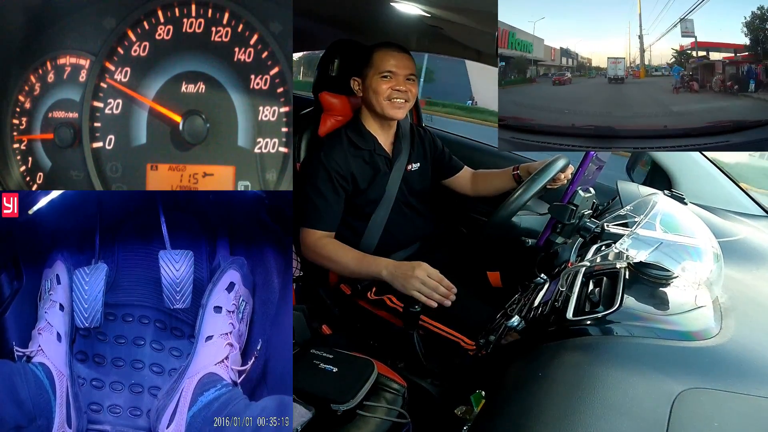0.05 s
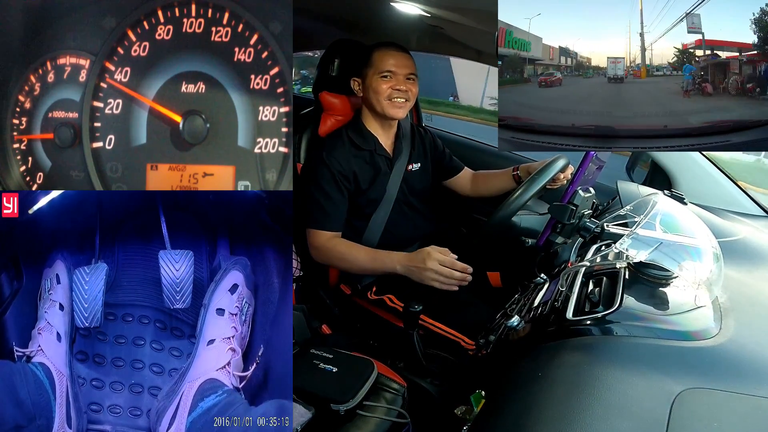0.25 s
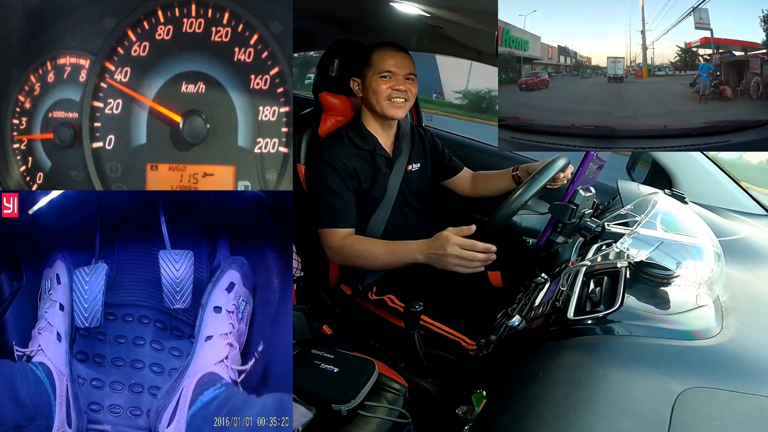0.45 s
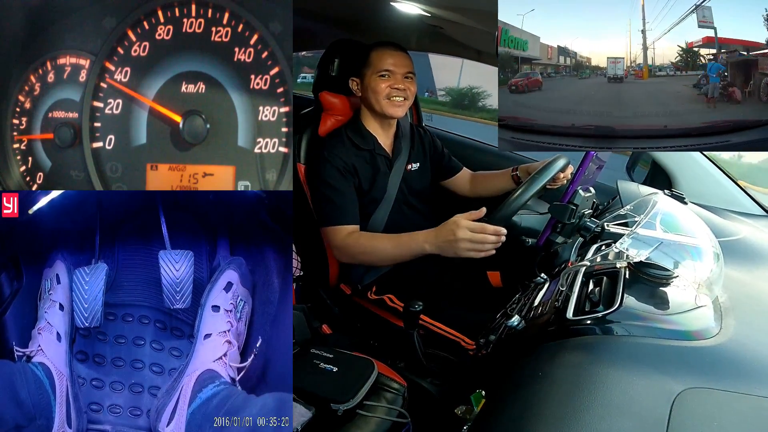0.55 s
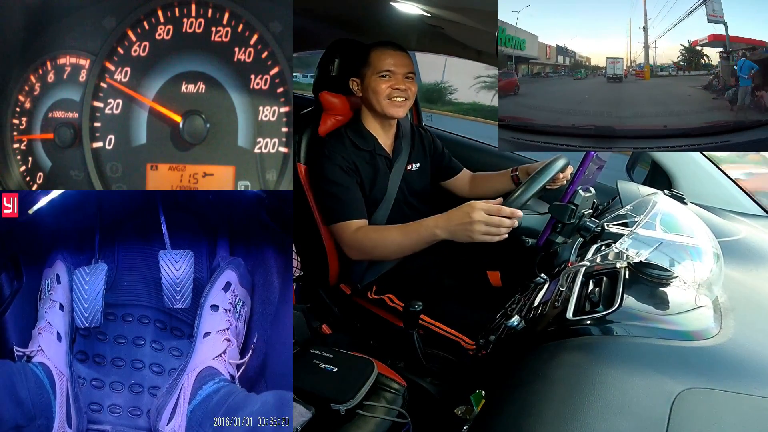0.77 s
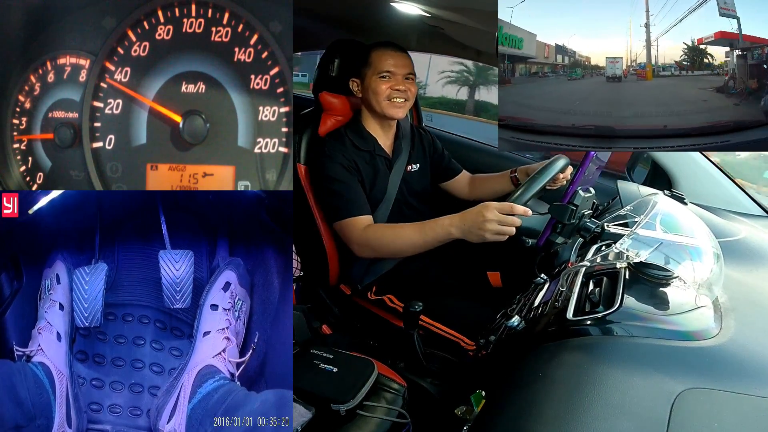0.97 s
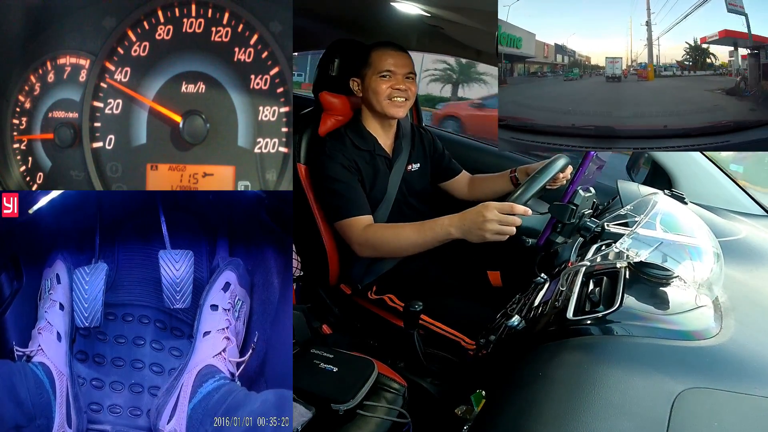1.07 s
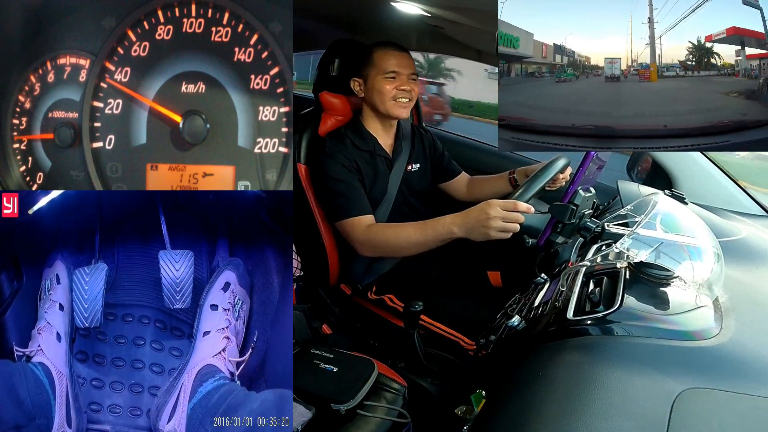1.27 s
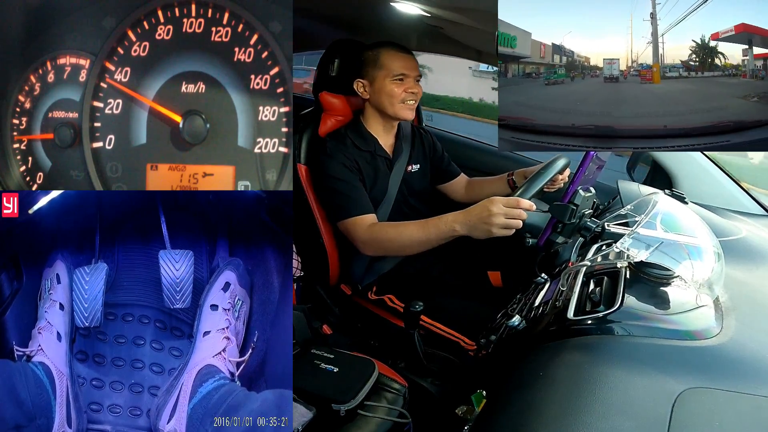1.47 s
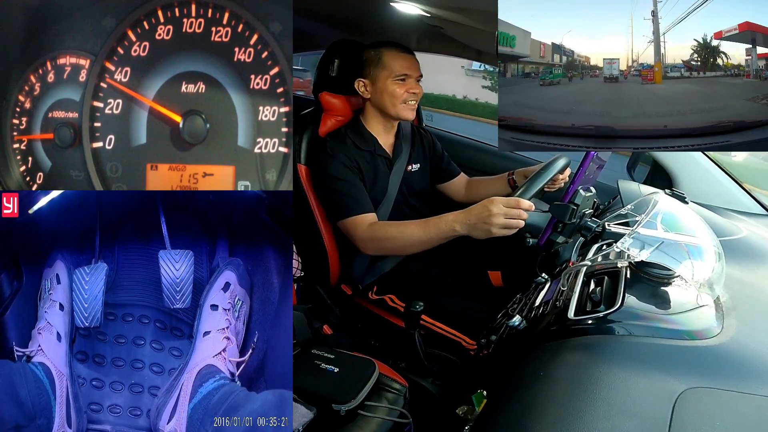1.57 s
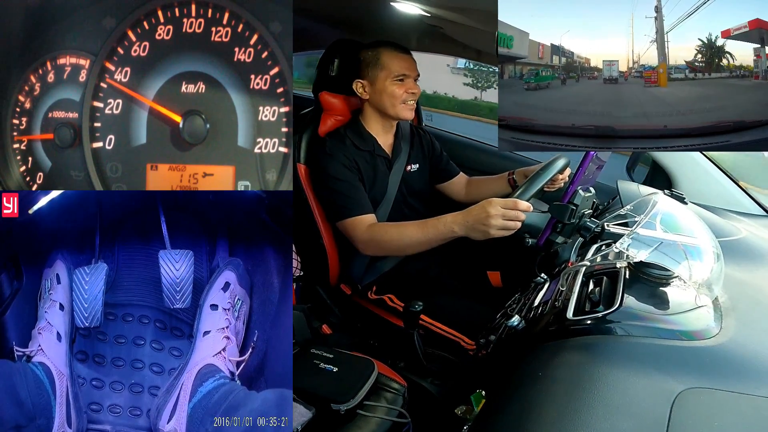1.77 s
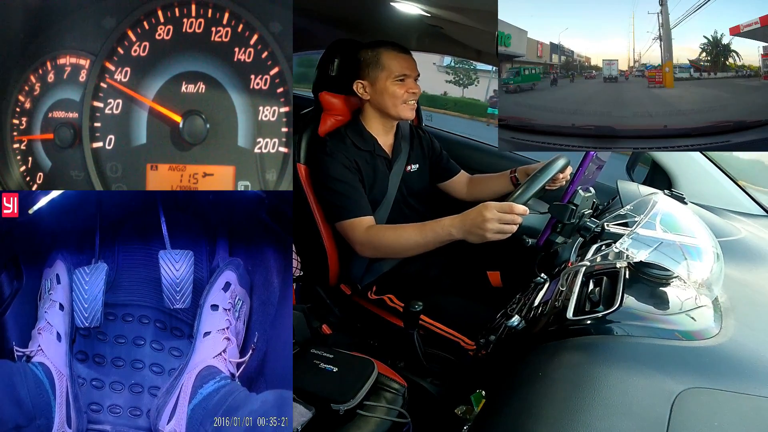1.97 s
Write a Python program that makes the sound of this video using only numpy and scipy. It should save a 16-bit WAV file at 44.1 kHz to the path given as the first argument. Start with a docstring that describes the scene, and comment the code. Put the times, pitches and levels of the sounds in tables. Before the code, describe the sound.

Inside a car rolling slowly, a deep wavering engine drone mixes with boomy body vibration and quiet, dull airy hiss. Small trim clicks sound near half a second and again before one second, picked up in stereo.

```python
"""Inside a car rolling slowly, engine near idle, about 2 s, heard through a two-port microphone.
Throughout: firings and a second drone throb low as wavering sines; the road shakes body panels and cabin air,
which boom as noise-fed resonances over a rumble; tyres and vent air hiss as flickering noise bands.
From 0.07 s to 0.86 s five short scrapes make the trim tick. The microphone rounds the loudest booms."""
import sys
import numpy as np
from scipy import signal
from scipy.fft import rfft, irfft, next_fast_len
from scipy.io import wavfile
from scipy.ndimage import uniform_filter1d

SR = 44100
rng = np.random.default_rng(int(sys.argv[2]) if len(sys.argv) > 2 else 0)


def unload_wav(signal):
    """Save mono or channel-first audio to the path in sys.argv[1] as 16-bit WAV at rate SR, clipped to [-1, 1]."""
    wavfile.write(
        sys.argv[1],
        SR,
        np.round(np.clip(np.atleast_2d(signal).T, -1, 1) * 32767).astype(np.int16),
    )


def makeup_ratio(level_db):
    """Linear amplitude ratio for a level in decibels (20 dB per factor of ten)."""
    decades = np.asarray(level_db, float) / 20
    return 10 ** decades


N = 89214  # samples

# engine firing: t/s, f/Hz, level/dB
FIRING = [(0.03, 35.75, -12.5), (0.286, 34.18, -17.5), (0.324, 34.01, -30.5), (0.488, 35.68, -17),
          (0.962, 34.23, -16.5), (1.056, 31.76, -26.5), (1.176, 32.1, -14), (1.34, 33.24, -21),
          (1.498, 32.85, -11.5), (1.596, 35.68, -24), (1.7, 35.53, -15), (1.792, 31.62, -14.5),
          (1.946, 31.4, -25), (1.99, 31.6, -11.5)]
# multiples 1-4 of the firing rate: relative level/dB
ORDER_LEVELS_DB = [-1.5, -19, -18, -20]
# second low drone, probably the driveline: t/s, f/Hz, level/dB
DRIVELINE_DRONE = [(0.03, 55.4, -18), (0.128, 58.3, -14.5), (0.176, 57.6, -20.5), (0.312, 60.2, -12),
                   (0.33, 59.9, -23), (0.384, 57.88, -18.5), (0.548, 56.3, -16), (0.592, 54.4, -29),
                   (0.608, 54.27, -14.5), (0.978, 55.7, -16.5), (1.066, 52.92, -21.5),
                   (1.306, 53.32, -14.5), (1.366, 55.19, -15), (1.584, 57.64, -16.5), (1.886, 55.36, -13),
                   (1.99, 53.2, -15)]
# body and cabin-air resonances: f/Hz, width/Hz, relative level/dB
BODY_BOOMS = [(30, 13, -6), (66.6, 21, -7), (89.1, 16.2, -2.5), (116.8, 16, -7), (151.3, 22, -7.5),
              (174.3, 30.6, -10), (204.9, 26, -12)]
# higher panel resonances: f/Hz, width/Hz, relative level/dB
HIGH_PANELS = [(229, 26, 0.5), (251, 25.7, -2), (305.3, 37, -8), (340.2, 50, -7.5)]
# road roughness: t/s, boom level/dB, high-panel level/dB
ROAD_LEVELS = [(0.0, -10, -19.5), (0.14, -19.5, -37), (0.2, -14, -29.5), (0.45, -16, -29),
               (0.62, -17, -24.5), (0.8, -17, -24), (1.1, -14.5, -24.5), (1.2, -17, -23),
               (1.63, -13, -30.5), (1.66, -15, -24), (1.88, -20.5, -30), (2.02, -13, -24.5)]
# rumble spectrum: f/Hz, relative density/dB per Hz
RUMBLE_SPECTRUM = [(7.1, -34.5), (12, -9.5), (43, -3), (71, 2), (184, -10), (276, -20.5), (360, -21),
                   (434, -28.5), (500, -27.5), (650, -64.5), (1100, -120)]
# tyre and vent-air spectrum: f/Hz, relative density/dB per Hz
HISS_SPECTRUM = [(220, -35), (380, -2.5), (437, -8.5), (502, -5), (596, -4.5), (685, -11), (878, -9),
                 (1130, -9.5), (1850, -22), (2060, -22), (2480, -28.5), (2810, -28), (5480, -37.5),
                 (7250, -44), (8330, -52.5), (9300, -52), (10200, -52.5), (11000, -60.5), (15500, -85)]
# cabin resonances in the hiss: f/Hz, width/Hz, lift/dB
CABIN_MODES = [(488, 25, 2.5), (780, 29, 0.5), (884, 27, 4.5), (1116, 12, 6), (1360, 11, 5.5),
               (1990, 77, -1), (2780, 60, 2), (3240, 47, 2)]
# hiss: t/s, level/dB
HISS_LEVEL = [(0, -34), (.14, -35.5), (.4, -34.5), (1, -34), (1.5, -33.5), (2.02, -34)]
# trim ticks: t/s, peak level/dB, scrape length/s, brightness/dB per octave, favoured mode f/Hz
TRIM_TICKS = [(.074, -56, .005, 9, 10200), (.402, -51, .011, 3, 10200), (.456, -35, .009, -2.5, 4800),
              (.841, -38, .007, -5, 3000), (.862, -59, .007, 9, 11300)]
# trim modes: f/Hz, relative level/dB, t60/s
TRIM_MODES = [(3000, -2, .012), (3630, 0, .007), (4200, -4, .004), (4800, -5, .005), (5700, -4, .004),
              (6600, -8, .006), (7400, -10, .006), (9300, -27, .003), (10200, -22, .004),
              (11300, -27, .003), (12500, -31, .003)]
# port likeness: f/Hz, coherence/0-1
PORT_COHERENCE = [(60, .9995), (130, .997), (290, .98), (640, .87), (1410, .52), (3100, .6), (6820, .65),
                  (15000, .66)]
# port balance: f/Hz, left minus right level/dB
PORT_BALANCE = [(60, -.55), (110, -.5), (200, 0), (380, .5), (700, 2), (1290, 2.5), (2380, 1.5), (4400, 0),
                (8120, 1), (15000, 1)]
# port phase: f/Hz, left lead/rad
PORT_LEAD = [(30, -0.058), (600, -0.12), (1380, -1), (1750, -0.81), (2200, -0.59), (3400, 0.051),
             (4700, -.1), (15000, 0)]

FIRING_SCATTER_DB, DRONE_SCATTER_DB, BOOM_SCATTER_DB = 3, 1.9, 1.24
RUMBLE_DB = -19.5
DRIFT_S, FIRMNESS = 0.00123, 0.44  # time wander bending boom pitch; 0 = free noise, 1 = steady strand
CONTACT_S, FAVOURED_DB = 0.00027, 6  # rise of each trim ring; lift of the mode nearest the struck spot
CEILING = 0.95  # amplitude at which the microphone saturates


def read(table, hz):
    """Straight lines on a log-frequency axis."""
    a = np.array(table, float)
    return np.interp(np.log(np.maximum(hz, 1)), np.log(np.maximum(a[:, 0], 1)), a[:, 1])


def curve(table, column):
    """One column of a table against time."""
    a = np.array(table, float)
    return np.interp(np.arange(N) / SR, a[:, 0], a[:, column])


def unit(x):
    """Rms 1."""
    return x / np.sqrt(np.mean(x ** 2))


def walk(rate_hz):
    """Random values held 1 / rate_hz seconds and slewed twice; spread near 1."""
    hold = int(SR / rate_hz)
    steps = np.repeat(rng.standard_normal(N // hold + 1), hold)
    slewed = uniform_filter1d(uniform_filter1d(steps, hold), hold)
    return 1.69 * slewed[:N]


def resonance(hz, centre_hz, width_hz):
    """Bell of height 1 about a resonance."""
    return 1 / (1 + ((hz - centre_hz) / (width_hz / 2)) ** 2)


def noise(gain):
    """Noise at two ports, coloured by gain(hz), as alike, tilted and shifted as the cabin makes it."""
    hz = np.arange(N // 2 + 1) * SR / N
    coherence = np.sqrt(np.clip(read(PORT_COHERENCE, hz), 0, 1))
    a, b = rfft(rng.standard_normal((2, N)), axis=1) * gain(hz)
    mid = a * np.sqrt((1 + coherence) / 2)
    side = b * np.sqrt((1 - coherence) / 2)
    # half the difference to each port
    tilt = makeup_ratio(read(PORT_BALANCE, hz) / 2) * np.exp(0.5j * read(PORT_LEAD, hz))
    return irfft(np.array([(mid + side) * tilt, (mid - side) / tilt]), N, axis=1)


def engine():
    """Low multiples of the firing rate and the drone, each wavering in pitch and level."""
    firing_hz = curve(FIRING, 1) * (1 + 0.0088 * walk(8))
    firing_phase = 2 * np.pi * np.cumsum(firing_hz) / SR
    orders = 0
    for k, db in enumerate(ORDER_LEVELS_DB, start=1):
        level = makeup_ratio(db + FIRING_SCATTER_DB * walk(12.05))
        orders = orders + level * np.sin(k * firing_phase + rng.uniform(0, 2 * np.pi))
    firings = orders * makeup_ratio(curve(FIRING, 2))

    drone_hz = curve(DRIVELINE_DRONE, 1) * (1 + 0.0296 * walk(9.89))
    drone_phase = 2 * np.pi * np.cumsum(drone_hz) / SR
    drone = np.sin(drone_phase) * makeup_ratio(curve(DRIVELINE_DRONE, 2) + DRONE_SCATTER_DB * walk(11))

    balance = makeup_ratio(np.array([[0.5], [-0.5]]) * PORT_BALANCE[0][1])
    return np.sqrt(2) * (firings + drone) * balance  # sqrt(2): levels are rms


def rings(table):
    """Road shake rings each resonance as a fairly firm strand that wanders in level and pitch."""
    out = 0
    for f, width, db in table:
        strand = noise(lambda hz: resonance(hz, f, width))
        swing = np.abs(signal.hilbert(strand.sum(axis=0), next_fast_len(N))[:N])
        strand = strand / (swing / swing.mean() + 0.091) ** FIRMNESS  # evens out the envelope
        at = np.arange(N) + DRIFT_S * SR * walk(9)
        bent = np.array([np.interp(at, np.arange(N), port) for port in strand])
        out = out + makeup_ratio(db + BOOM_SCATTER_DB * walk(12)) * unit(bent)
    return unit(out)


def booming():
    """Body booms and higher panels, shaken by the road, over a broad rumble below 600 Hz."""
    booms = rings(BODY_BOOMS) * makeup_ratio(curve(ROAD_LEVELS, 1))
    panels = rings(HIGH_PANELS) * makeup_ratio(curve(ROAD_LEVELS, 2))
    rumble = unit(noise(lambda hz: makeup_ratio(read(RUMBLE_SPECTRUM, hz)) * (hz < 600)))
    return booms + panels + rumble * makeup_ratio(RUMBLE_DB)


def hiss():
    """Tyre and vent air: half-octave-spaced bands, lifted at cabin resonances, that flicker a little."""
    def quick(w):
        return w - uniform_filter1d(w, SR // 10)  # fast part only

    def colour(hz):
        lift = sum(db * resonance(hz, f, width) for f, width, db in CABIN_MODES)
        return makeup_ratio(read(HISS_SPECTRUM, hz) + lift)

    def window(hz, mid_hz):
        return np.cos(np.pi / 2 * np.clip(2 * np.log2((hz + 1) / mid_hz), -1, 1))

    out = 0
    shared_db = quick(walk(20))
    for mid_hz in 300 * 2 ** np.arange(0, 6, 0.5):
        band = noise(lambda hz: colour(hz) * window(hz, mid_hz))
        out = out + band * makeup_ratio(shared_db + 1.3 * quick(walk(24.95)))
    return unit(out) * makeup_ratio(curve(HISS_LEVEL, 1))


def ticks():
    """A short scrape rings the modes of the plastic trim."""
    out = np.zeros((2, N))
    t = np.arange(2000) / SR
    for start_s, peak_db, length_s, tilt_db, favoured_hz in TRIM_TICKS:
        mid, side = rng.standard_normal((2, len(t)))
        push = mid + 0.29 * side * np.array([[1], [-1]])
        push = push * np.sin(np.pi * np.clip(t / length_s, 0, 1)) ** 0.5
        tick = 0
        for hz, db, t60_s in TRIM_MODES:
            decay = 1000 ** (-t / t60_s)
            ring = np.sin(2 * np.pi * hz * t) * decay * (1 - np.exp(-t / CONTACT_S)) ** 2
            mode = unit(signal.fftconvolve(push, ring[None], axes=1)[:, :len(t)])
            brightness_db = tilt_db * np.log2(hz / TRIM_MODES[0][0])
            tick = tick + mode * makeup_ratio(db + brightness_db + FAVOURED_DB * (hz == favoured_hz))
        i = int(start_s * SR)
        out[:, i:i + len(t)] += tick / np.abs(tick).max() * makeup_ratio(peak_db)
    return out


def scene():
    """All layers at the microphone."""
    return engine() + booming() + hiss() + ticks()


def low_pass(x):
    """Removes everything above the highest recorded frequency."""
    return signal.sosfilt(signal.butter(12, 15710, fs=SR, output="sos"), x)


def record(dry):
    """The microphone saturates softly on boom peaks."""
    mix = CEILING * np.tanh(dry / CEILING)
    return low_pass(mix)


dry = scene()
out = record(dry)
unload_wav(out)
```